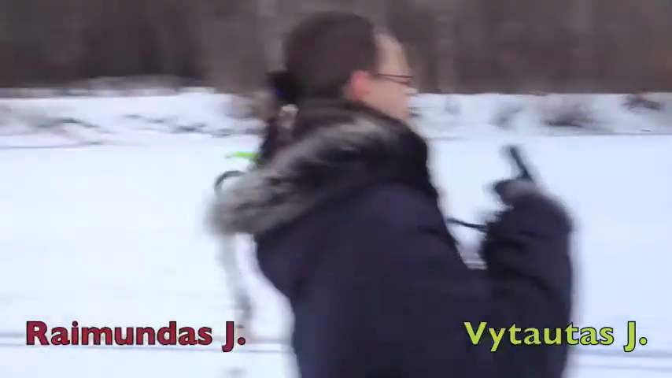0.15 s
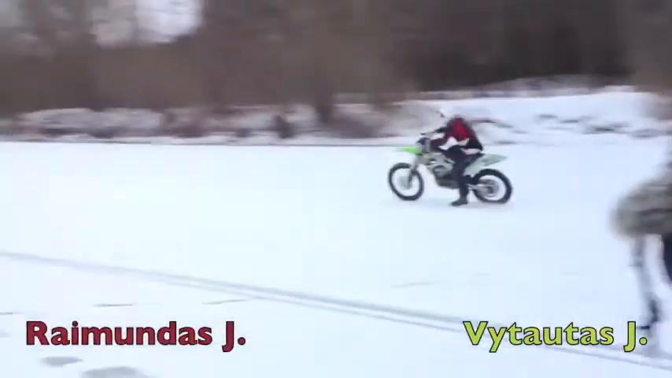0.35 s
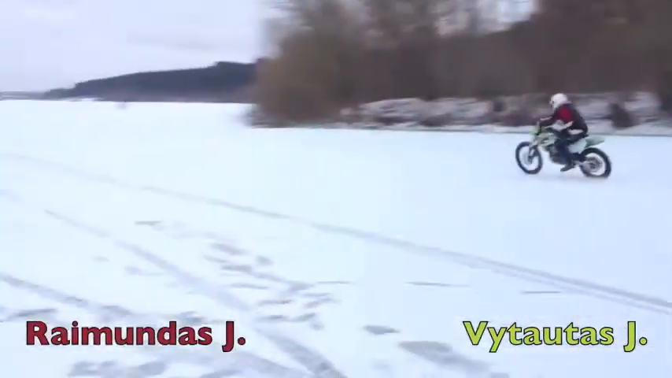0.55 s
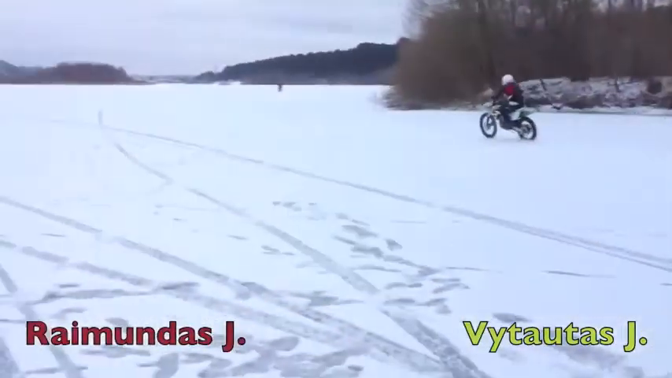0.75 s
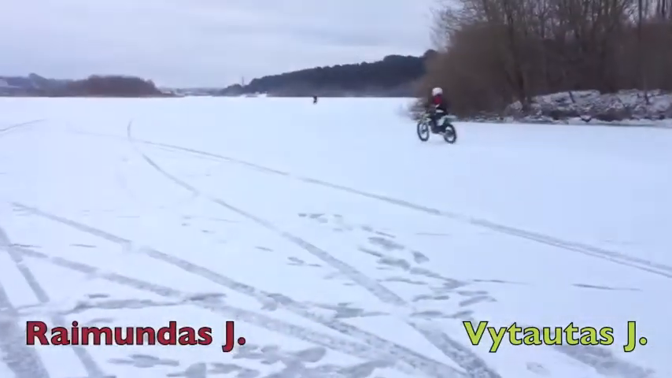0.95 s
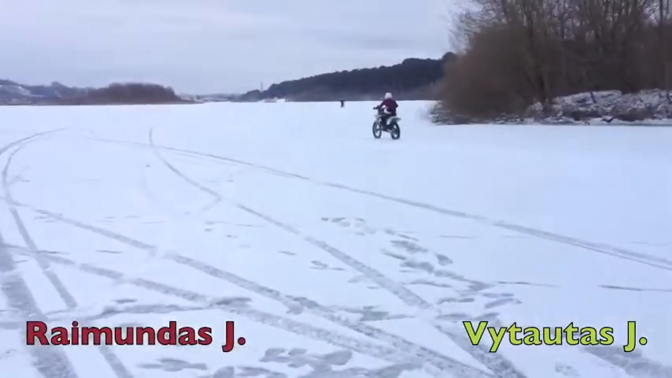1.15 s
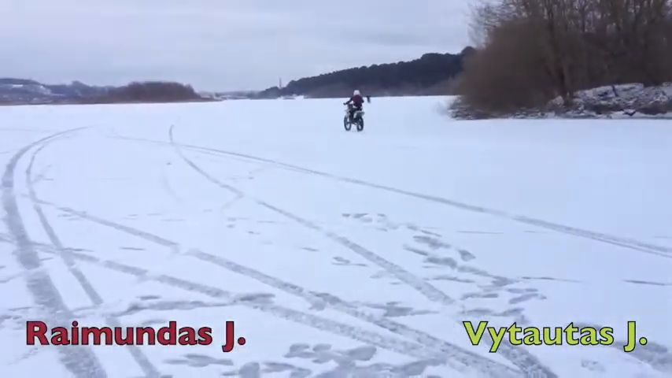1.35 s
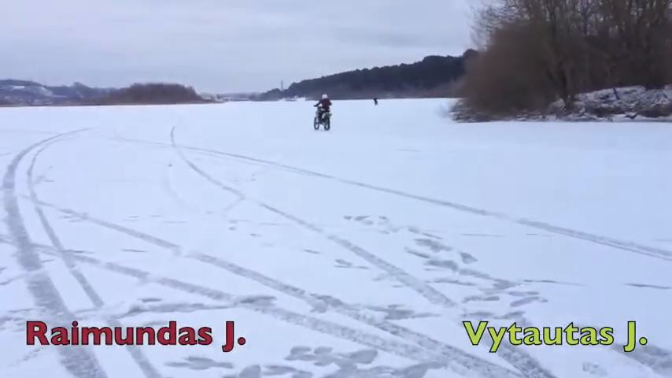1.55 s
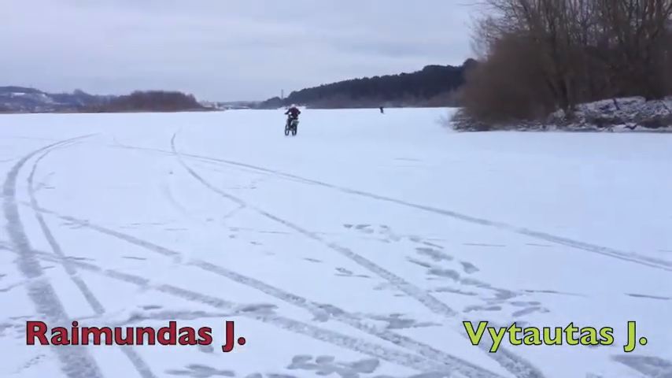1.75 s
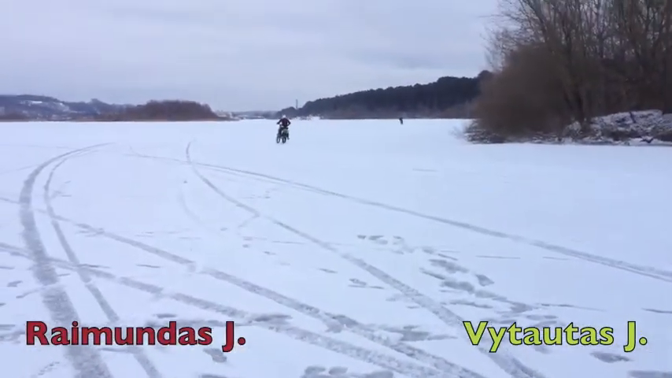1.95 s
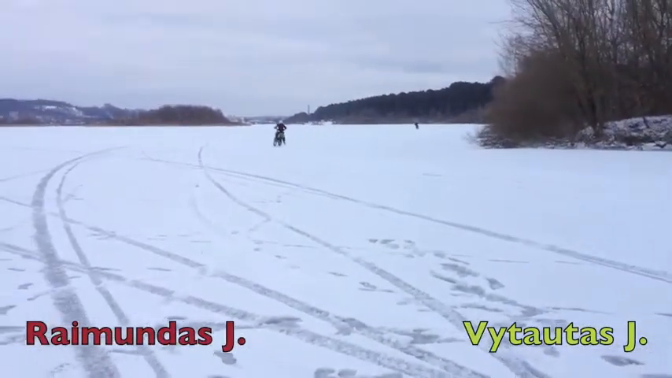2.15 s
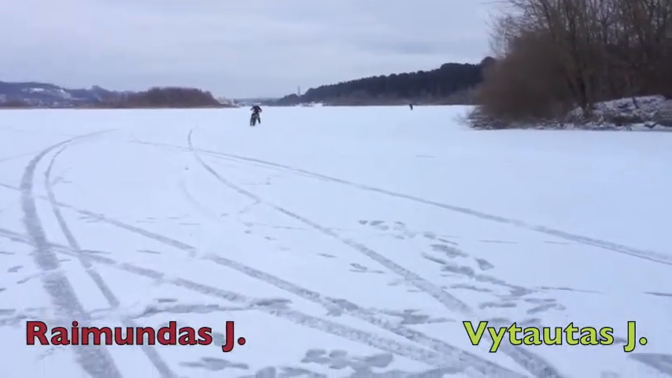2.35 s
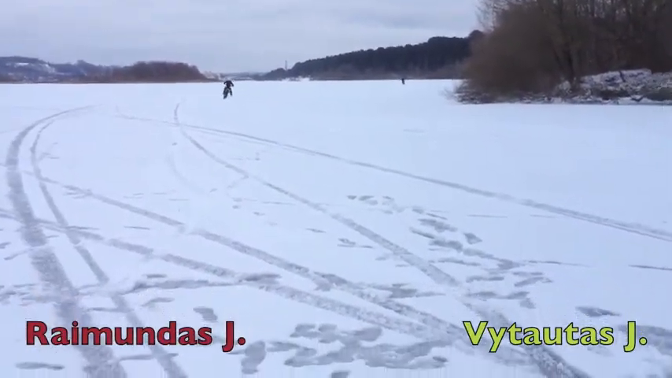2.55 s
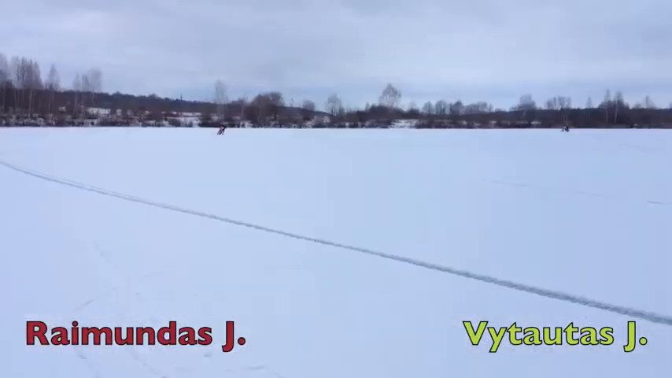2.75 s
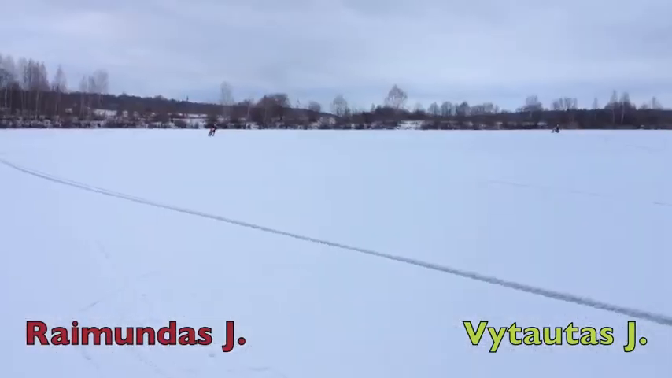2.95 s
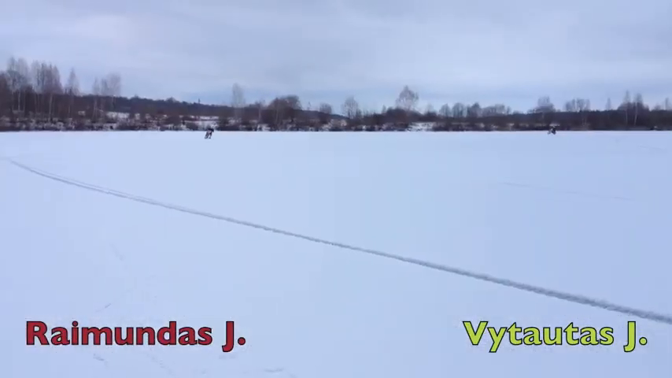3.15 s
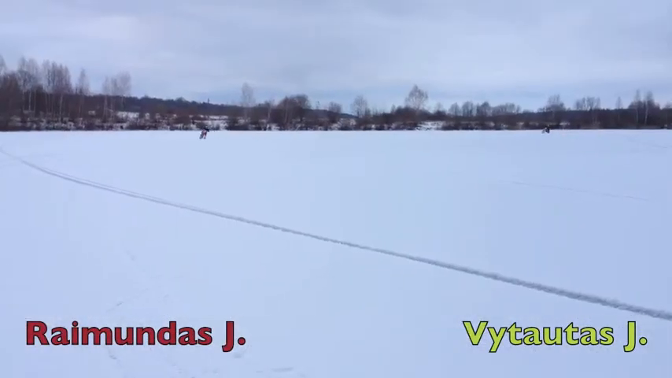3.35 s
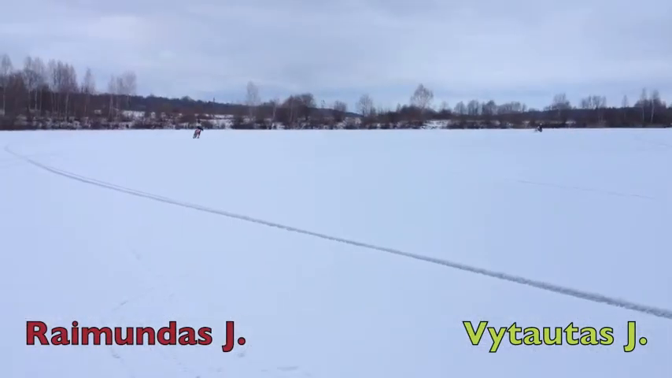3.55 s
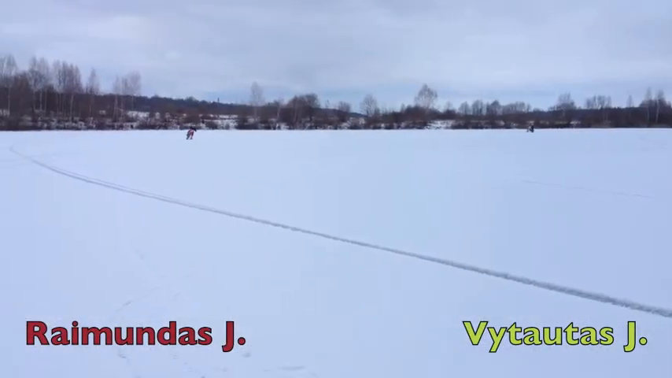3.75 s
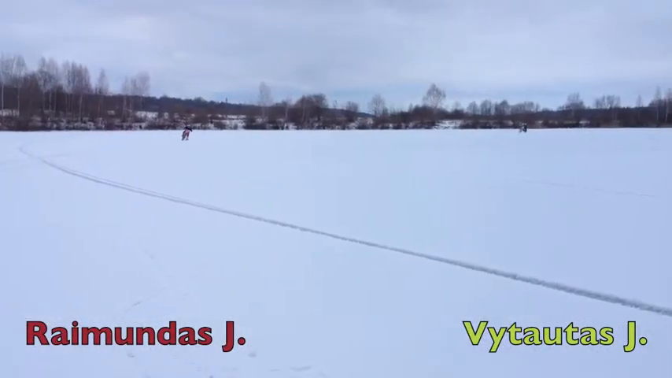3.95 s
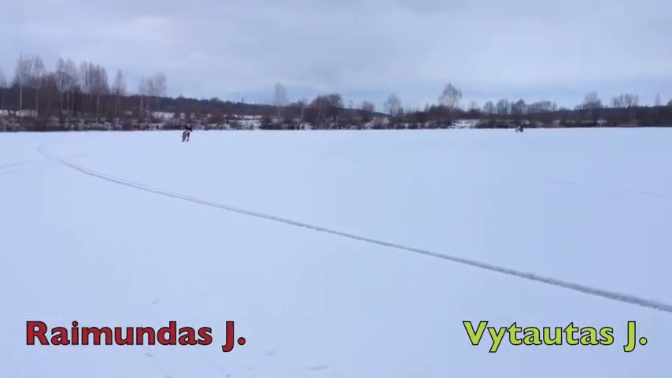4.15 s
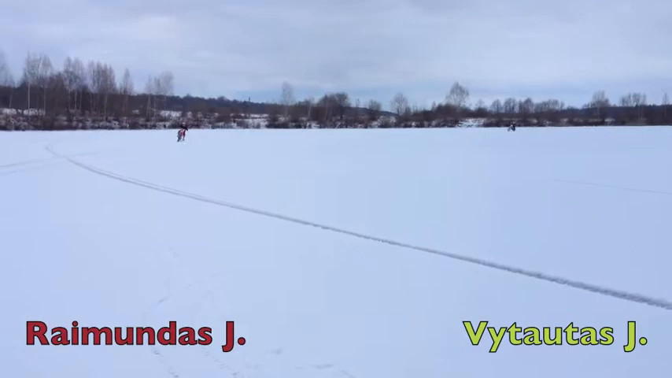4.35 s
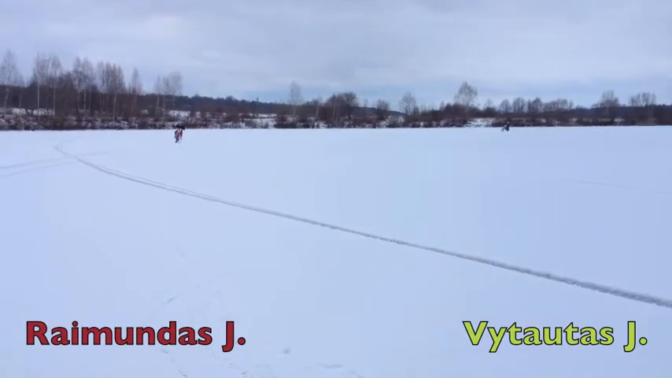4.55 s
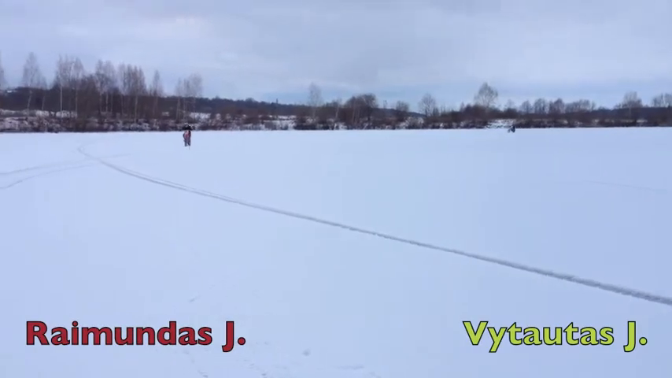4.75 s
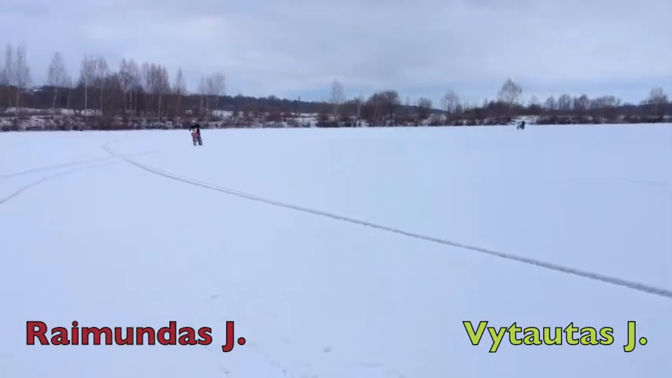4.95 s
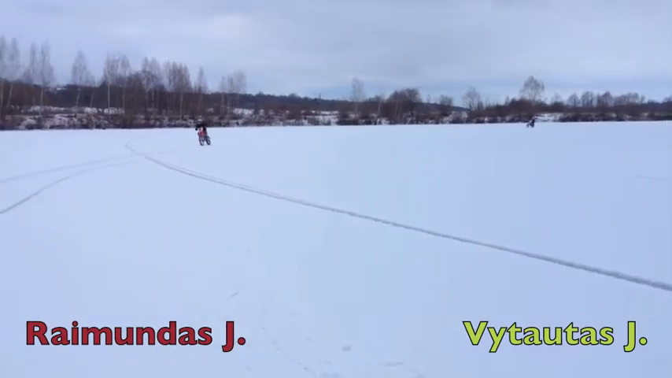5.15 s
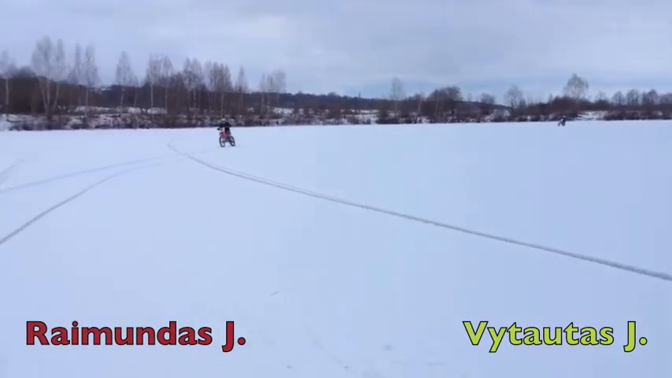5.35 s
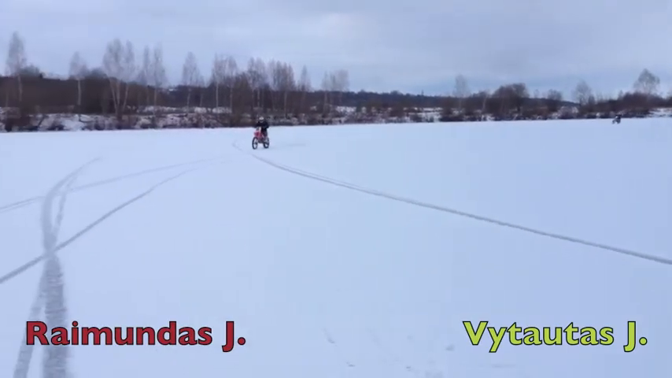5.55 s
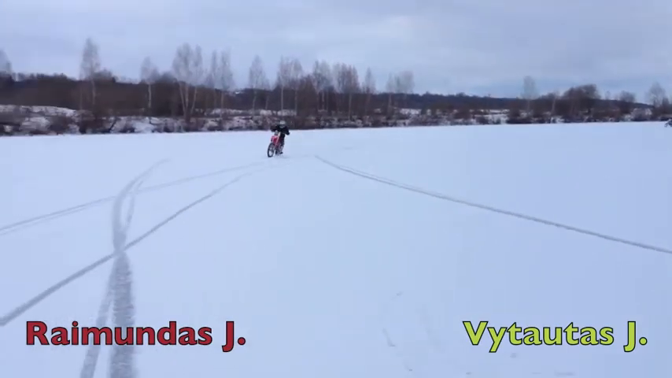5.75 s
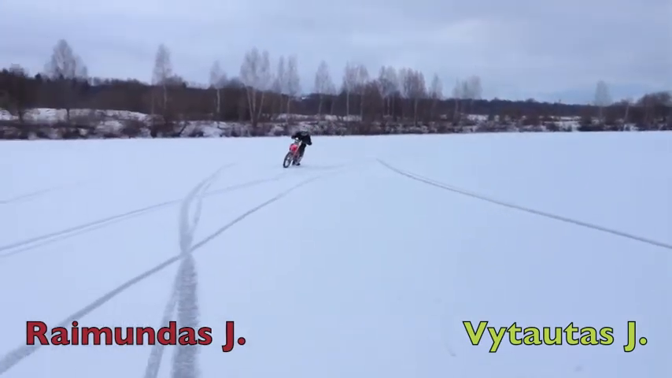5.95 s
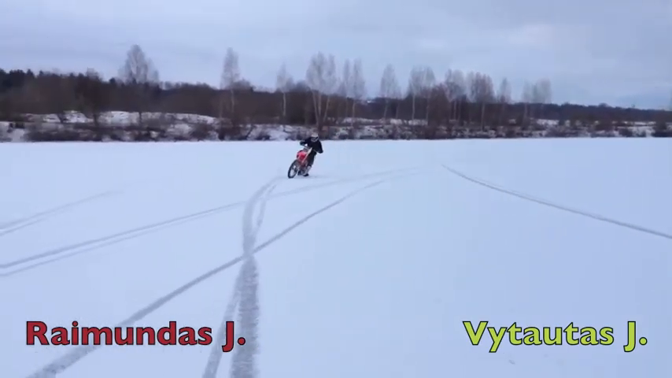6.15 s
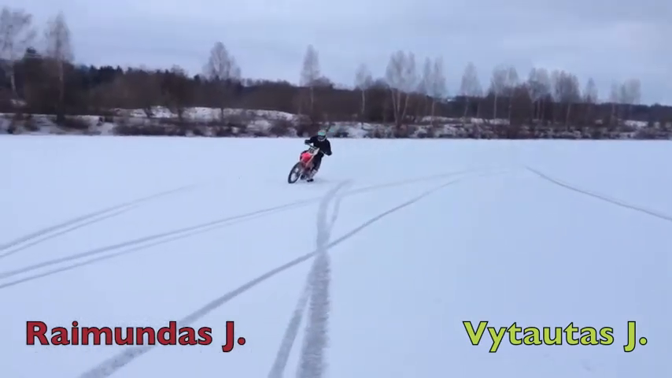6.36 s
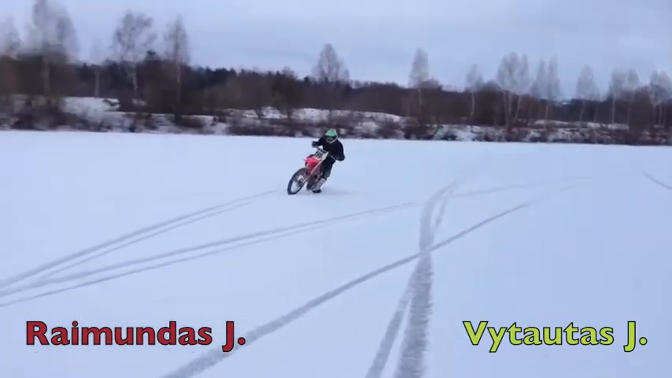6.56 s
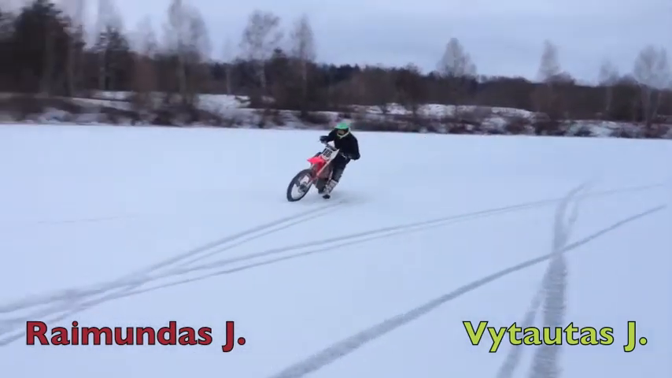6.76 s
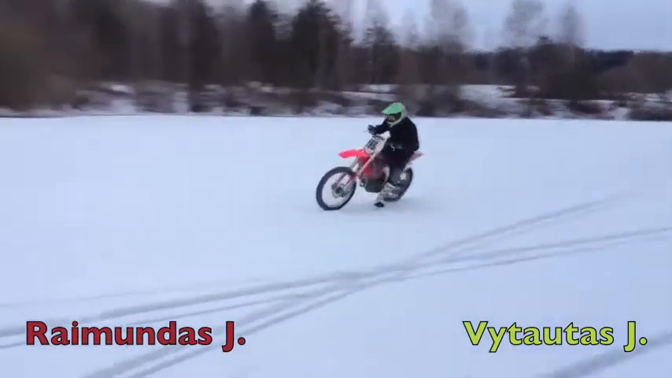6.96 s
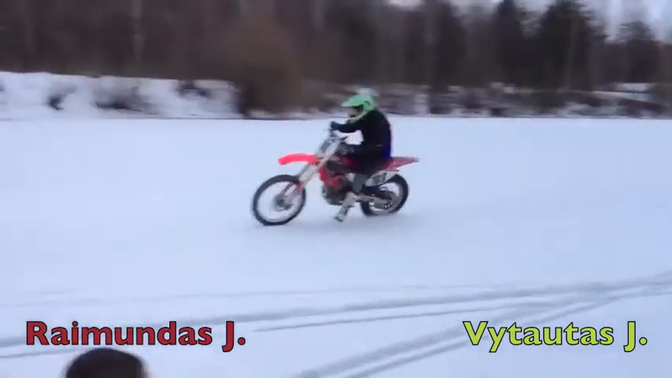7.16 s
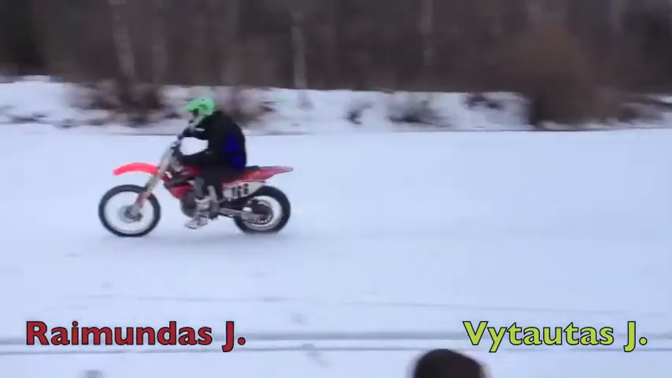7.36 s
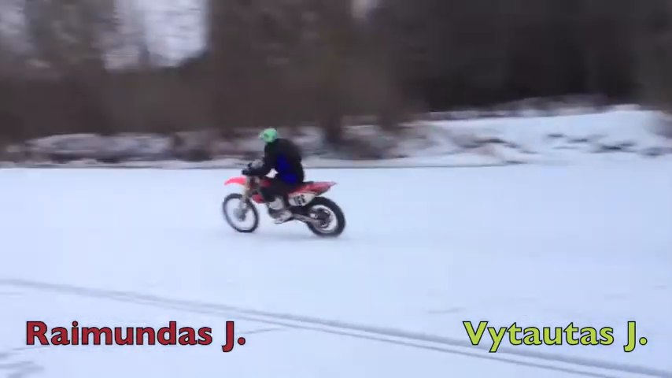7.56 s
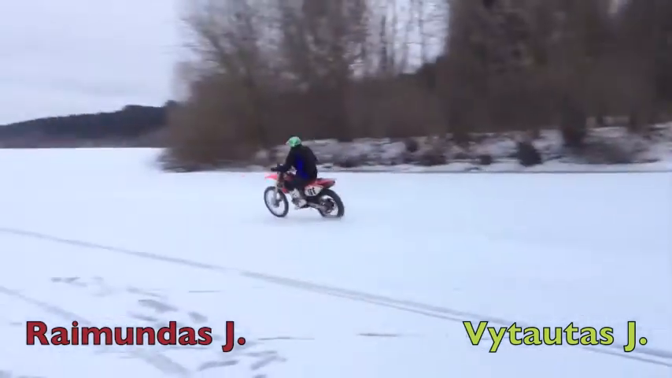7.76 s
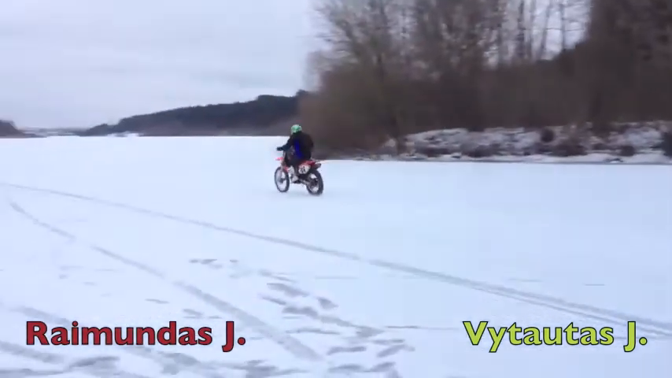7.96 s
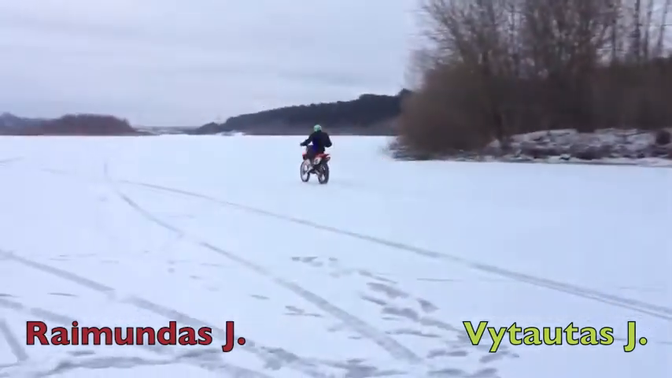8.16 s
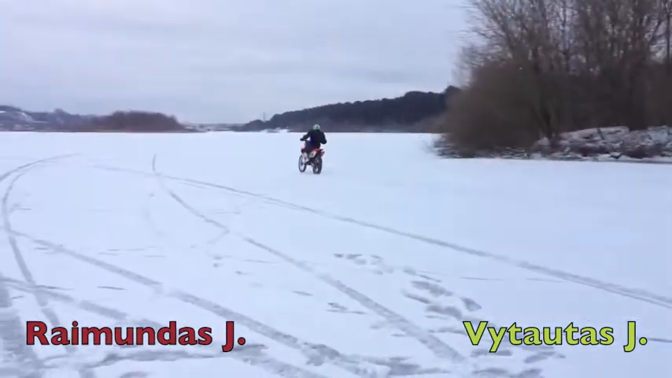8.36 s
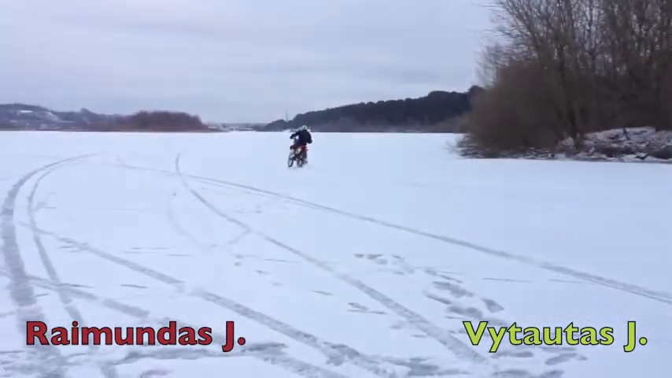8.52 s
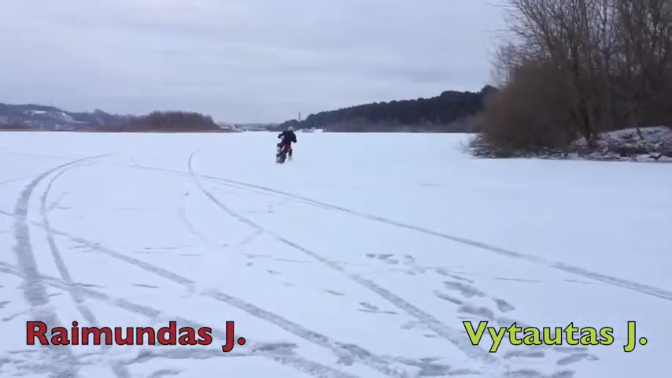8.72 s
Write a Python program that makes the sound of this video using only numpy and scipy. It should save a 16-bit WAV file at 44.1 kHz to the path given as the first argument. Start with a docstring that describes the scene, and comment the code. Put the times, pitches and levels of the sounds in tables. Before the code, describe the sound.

A dirt bike passes close right at the start, its rattling, droning engine turning into a sharp exhaust crackle by about 0.5 seconds, with a brief hiss of snow. Another engine hums faintly far off. At 1.4 seconds the throttle shuts and the pitch sinks to a ragged burble; from 2.2 seconds it picks up again with a couple of backfire pops. At 2.6 seconds the sound dips briefly and a second dirt bike takes over, distant, with a steady drone and slight whine. It grows louder, its pitch sagging near 5 seconds and rising again. It passes close and loud around 7.2 seconds, the rasp giving way to hard exhaust cracks as the pitch falls. Near 7.9 seconds it eases off with a few pops, then revs up and pulls away until the end, near 8.8 seconds. Light wind occasionally rumbles on the microphone.

```python
"""Two dirt bikes on snow

Two single-cylinder four-strokes are heard in turn, joined by a quick fade. The first passes, rides off,
coasts and picks up again, another droning far off; the second comes from afar, passes and pulls away.
Periodic firing gives a harmonic drone, and the mechanism a rattling rasp. The exhaust is directional:
from behind, each firing cracks out of the tailpipe. Stray backfires, hiss and light wind join in."""
import sys
import numpy as np
from scipy import signal
from scipy.fft import rfft, irfft, next_fast_len
from scipy.io import wavfile
from scipy.ndimage import uniform_filter1d, map_coordinates

SR = 44100
rng = np.random.default_rng(int(sys.argv[2]) if len(sys.argv) > 2 else 0)


def dump(signal):
    """Clip the signal to [-1, 1] and save it as 16-bit WAV at the path in sys.argv[1]."""
    limited = np.clip(np.atleast_2d(signal).T, -1, 1)
    pcm = np.round(limited * 32767).astype(np.int16)
    wavfile.write(sys.argv[1], SR, pcm)


N = 387638
T = np.arange(N) / SR

# exhaust spectrum of the second bike and of the backfires: f/Hz, relative level/dB
EXHAUST_SPECTRUM = [(250, -18), (450, -12.5), (700, -15.5), (1000, -10.5), (1350, 0), (1700, -2), (2250, 3),
                    (3000, -3.5), (3500, -7.5), (4050, -20.5), (4550, -15), (5400, -25.5), (7300, -10.5),
                    (8500, -20), (10500, -32.5), (13000, -62), (15500, -36)]


def first_bike():
    """Source directivity: an early, quick pass turns the sound from intake rasp to exhaust cracks."""
    speed = [(0, 69.08), (0.3, 69.0), (0.6, 68.54), (0.87, 68.58), (1, 71.64), (1.15, 69.33), (1.38, 66.86),
             (1.46, 56.97), (1.6, 52.62), (1.85, 48.82), (2.15, 49.41), (2.28, 55.47), (2.45, 58.83),
             (2.61, 62.91)]  # firing rate: t/s, f/Hz
    nearness = [(0.0, -4), (0.3, -3), (0.7, -2.5), (1.0, -4), (1.38, -4.5), (1.8, -6.5), (2.2, -5.5),
                (2.5, -3.5)]  # closeness to the listener: t/s, level/dB
    crack_spectrum = [(250, -7), (450, -17), (700, -23), (1000, -6.5), (1250, -2), (1600, -6), (2250, -6.5),
                      (2700, -12.5), (3150, -7.5), (3600, -15.5), (4500, -13), (6500, -9), (8000, -19),
                      (9600, -30.5), (13000, -21), (15500, -63)]  # exhaust pulses: f/Hz, relative level/dB
    rattle_spectrum = [(250, -33), (450, -15), (700, -19), (1050, -6), (1600, -12), (2150, 2.5), (2600, 3),
                       (3100, 4.5), (3700, -3.5), (5000, -5), (7000, -2), (8400, -9), (9600, -13.5),
                       (13000, 19.5), (15500, 24)]  # mechanical noise: f/Hz, relative level/dB
    pipe_ring = [(0, 1250), (.25, 1310), (.5, 1900), (.85, 2400), (1.1, 2080), (1.4, 2180), (2.3, 2210)]  # tailpipe resonance: t/s, f/Hz
    voicing = [(140, 3), (205, -3), (275, -0.5), (345, -2.5), (450, 3)]  # colouring of the drone: f/Hz, gain/dB
    # moving notch and peaks: t/s, f/Hz, gain/dB
    hollow = [(.05, 1980, -7), (.22, 1750, -8), (.33, 2600, 7), (.5, 3140, -10), (.66, 3220, -20),
              (.8, 3340, -29), (.95, 3120, -18), (1.05, 3900, -2), (1.3, 4750, 1), (1.6, 4500, -9),
              (2.4, 3900, -10)]  # the echo off the snow interferes with the direct sound
    bark = [(.1, 1110, 8.5), (.5, 1220, 11), (.7, 1320, 4.5), (.9, 2160, 5.5), (1.3, 2220, 12.5),
            (1.5, 1980, 9.5), (2.4, 2040, 8)]  # broad exhaust peak, climbing as the pipe turns toward the listener
    edge = [(.1, 3000, -13), (.33, 4640, 1), (.5, 3980, 3), (.68, 4300, 9), (.85, 4650, 4.5),
            (1.05, 6000, 6.5), (1.3, 7850, 5), (1.6, 7000, 1.5), (2.2, 3100, 0), (2.4, 3160, 4.5)]  # higher, rasping peak
    nasal = [(.15, 2190, 5), (.4, 1900, 4.5), (.7, 1300, 0.5), (1.0, 1270, 10.5), (1.4, 1250, 3),
             (2.0, 1400, -2.5), (2.4, 1480, 0)]  # nasal peak beside the bark
    return engine(
        speed, nearness, crack_spectrum, rattle_spectrum, pipe_ring, voicing, (hollow, bark, edge, nasal),
        start_cycle=.71, abeam_s=.44, swing_s=.18, bands_db=[-14.5, -13, -19, -27],
        idle_db=-6, pull_db=12, aim_db=6.5, repeat_db=-5.5, whine_db=-16, least_ragged=.36,
        ring_s=.0019, ring_db=0, ring_scatter=.057, jet_s=.0034, jet_db=7, can_db=-2.5,
        bounce_s=.000763, reflection=.75)


def second_bike():
    """Spreading loss and directivity: the engine swells from afar, then its exhaust swings into line."""
    speed = [(2.63, 67.17), (2.9, 69.12), (3.45, 68.6), (3.88, 74.8), (4.25, 75.45), (4.7, 74.34),
             (4.85, 66.2), (5, 61.59), (5.22, 74.0), (5.42, 79.45), (5.6, 73.85), (6.2, 75.6),
             (6.82, 75.05), (7.2, 71.17), (7.88, 65.05), (7.98, 53.23), (8.1, 55.67), (8.28, 55.61),
             (8.4, 57.69), (8.58, 59.05), (8.67, 64.26)]  # firing rate: t/s, f/Hz
    nearness = [(2.63, -12), (3.4, -9.5), (4.3, -8), (5.0, -6), (5.4, -3), (5.698, -2.5), (6.4, -0.5),
                (7.15, 1.5), (7.75, -0.97), (8.1, -1), (8.448, -1.5), (8.601, -4.5), (8.79, -4.5)]  # closeness to the listener: t/s, level/dB
    rattle_spectrum = [(250, -46), (450, -17), (600, -18.5), (800, -14), (1000, -4), (1200, 0.5),
                       (1550, -4), (1900, -2), (2170, -0.5), (2550, -4.5), (3200, -7), (3900, -15),
                       (5000, -17.5), (6400, -8), (7700, -14.5), (9700, -38), (13500, -37.5)]  # mechanical noise: f/Hz, relative level/dB
    pipe_ring = [(6.7, 2040), (7.3, 2210), (7.6, 2420), (7.8, 2940), (7.9, 2050), (8.51, 2220),
                 (8.58, 3000), (8.67, 2430)]  # tailpipe resonance: t/s, f/Hz
    voicing = [(140, -0.37), (205, -0.18), (275, -0.36), (345, 0.87), (450, -0.14)]  # colouring of the drone: f/Hz, gain/dB
    # ground-echo notch, exhaust bark, rasping peak and nasal peak: t/s, f/Hz, gain/dB
    hollow = [(2.8, 4960, 1), (4.3, 5200, -3), (5.6, 4500, -8), (6.7, 3240, 0), (7.0, 1890, -5.5),
              (7.3, 1650, -9), (7.55, 1830, -9), (7.7, 2120, -7), (7.8, 2440, -13), (7.95, 3900, 2),
              (8.4, 4050, -6), (8.55, 5500, -6)]
    bark = [(2.8, 1870, 6.5), (4.68, 1970, 5.5), (4.78, 2700, 4), (5.3, 2780, 3.5), (5.9, 2800, 4.5),
            (6.6, 2190, 2.5), (7.3, 2240, -0.5), (7.5, 2600, 3.5), (7.7, 3020, -0.5), (7.82, 3300, -2),
            (8.0, 2300, 0), (8.4, 2420, 5), (8.6, 2890, 0)]
    edge = [(3, 5770, 4), (4.25, 4020, 9.1), (5.4, 5500, 2.9), (7.1, 6750, 2), (7.75, 8300, 2.8),
            (8.451, 7450, 0.83), (8.58, 4400, 7.9), (8.79, 4200, 5.5)]
    nasal = [(3.1, 1310, 2.5), (4.7, 1150, -0.5), (4.92, 1200, 2.5), (5.08, 1250, 0), (5.2, 2030, 3),
             (5.55, 2050, 3), (6.6, 1700, -1), (6.92, 1500, 2.5), (7.15, 1280, 6.5), (7.45, 1330, 3.5),
             (7.72, 1290, 5.5), (7.82, 1880, -1), (8.3, 1500, 0.5), (8.6, 1410, 0)]
    return engine(
        speed, nearness, EXHAUST_SPECTRUM, rattle_spectrum, pipe_ring, voicing,
        (hollow, bark, edge, nasal),
        start_cycle=.0892, abeam_s=7.19, swing_s=.6, bands_db=[-18.5, -8.5, -20, -27.5],
        idle_db=-10, pull_db=-6, aim_db=34, repeat_db=-6, whine_db=-4.5, least_ragged=.27,
        ring_s=.0013, ring_db=2.5, ring_scatter=.084, jet_s=.0024, jet_db=6, can_db=-12.5,
        bounce_s=.001145, reflection=.54)


def engine(speed, nearness, crack_spectrum, rattle_spectrum, pipe_ring, voicing, formants, start_cycle,
           abeam_s, swing_s, bands_db, idle_db, pull_db, aim_db, repeat_db, whine_db, least_ragged,
           **crack_shape):
    """Superposition: drone, cracks and rattle add, weighted by throttle, nearness and direction."""
    # one value for each band: body, rasp, hiss, fizz
    shut_loss = [15.6, 29.43, 15.65, 21]  # with the throttle shut: loss/dB
    rear_loss = [5.6, 0.48, 5.6, 2]  # from behind: loss/dB
    falloff = [1.96, 1.464, 2.3, 3.66]  # absorption by snow and air: slope/(dB per dB of nearness)
    # runs of harder or softer firings: t/s, half length/s, body and rasp gain/dB, hiss and fizz gain/dB
    loads = [(0.133, 0.043, 1.5, -29.5), (0.433, 0.12, 0.5, 6), (0.695, 0.13, 5.5, 6.5),
             (0.746, 0.0086, -2.5, -1), (0.863, 0.037, 4.5, 8), (0.95, 0.025, -2, 4.5),
             (1.29, 0.024, -5, -7), (1.348, 0.04, 3, 6), (2.45, 0.17, -3, -5), (2.95, 0.13, 5, 0),
             (3.74, 0.59, 4, -11), (4.223, 0.15, 6, 22.5), (4.624, 0.21, 8, 9), (5.357, 0.26, -4.5, 14),
             (7.355, 0.25, 2, 2.5), (7.732, 0.15, 3, 8.5), (8.517, 0.073, 4.5, 5), (8.748, 0.042, 3, 6)]
    rate, = curve(speed)
    near, = curve(nearness)
    ring_hz, = curve(pipe_ring)
    opening = throttle()
    pulling = np.minimum(opening / .55, 1)  # below 1 the engine begins to coast
    rear = .5 + .5 * np.tanh((T - abeam_s) / swing_s)  # 0 from the front, 1 from behind
    turns, age, strength, chance = crank(rate, start_cycle)
    damping = np.exp(2.2 * (opening - .5))  # the wider the throttle, the shorter each crack
    crack = exhaust_cracks(age, strength, chance, ring_hz, crack_spectrum, damping, **crack_shape)
    crack = steady(bands(crack))
    rasp = steady(bands(rattle(turns, rattle_spectrum, repeat_db)))
    masking_db = .84 * np.maximum(near + 4.5, 0)  # close by, the rattle outgrows the whine
    rasp[0] += amp(whine_db - masking_db) * gear_whine(turns)
    load = amp(sum(np.outer([low, low, high, high], swell(s, half)) for s, half, low, high in loads))
    tilt_db = np.array([1.5, 4, -3, -11.5])[:, None]  # the cracks stand out less in the hiss
    crack_ratio = amp(idle_db + opening * (pull_db + aim_db * rear)) * amp(tilt_db)
    rattle_share = 1 / (1 + crack_ratio ** 2)  # of the power
    gains = amp([db + slope * near - shut * (1 - opening) - behind * rear
                 for db, slope, shut, behind in zip(bands_db, falloff, shut_loss, rear_loss)])
    voice = gains * (load * crack_ratio * crack + rasp) * np.sqrt(rattle_share)
    orders_db = [order_db(hz, near, rear, opening, pulling) + read(voicing, hz) + drone_swells_db(hz)
                 for hz in (k * rate for k in range(2, 8))]
    boom = drone(turns, rattle_share[0], orders_db, raggedness(opening, pulling, least_ragged))
    return moving_formants(voice.sum(0), formants) + boom + frame_buzz(turns, near, rear, pulling)


def throttle(open_s=.11, shut_s=.064):
    """Ramp response: the grip opens quickly and snaps shut more quickly."""
    twists = [(-.2, 0.63), (.75, 0.68), (1.387, 0), (2.22, 0.36), (2.6, 0.49), (3.47, 0.51), (4.05, 0.56),
              (4.682, 0.46), (5.001, 0.6), (5.47, 0.47), (5.9, 0.52), (7.859, 0.08), (8.02, 0.19),
              (8.242, 0.5), (8.49, 0.71)]  # grip positions, each held until the next: t/s, opening/(0 to 1)
    opening, before = np.zeros(N), 0
    for s, target in twists:
        ramp_s = open_s if target > before else shut_s
        opening += (target - before) * np.clip((T - s) / ramp_s, 0, 1)
        before = target
    return np.clip(opening, 0, 1)


def crank(rate, start_cycle, jitter_s=.00003):
    """Phase integrates rate: gives cycle count and each firing's age/s, strength and two random draws."""
    unevenness = [(.9, .9), (1.2, 2.2), (4.3, 2.4), (7.4, 1.3), (8.6, 1.3)]  # variation from firing to firing: t/s, spread/dB
    turns = start_cycle + np.cumsum(rate) / SR + jitter_s * rate * wander(70)
    deviation, *chance = rng.standard_normal((1024, 3))[turns.astype(int) + 1].T
    spread_db, = curve(unevenness)
    return turns, turns % 1 / rate, amp(spread_db * deviation), chance


def exhaust_cracks(age, strength, chance, ring_hz, spectrum, damping, ring_s, ring_db, ring_scatter,
                   jet_s, jet_db, can_db, bounce_s, reflection, can_hz=1210, can_s=.0009):
    """Impulse excitation: a shock echoes in the pipe, can and tailpipe ring, turbulent gas follows."""
    arrival_s, front_s = .000416, .00003
    since = np.maximum(age - arrival_s, 0)
    can = np.sin(2 * np.pi * can_hz * since) * since / can_s * np.exp(-since / can_s)
    fading = since * damping / ring_s
    pitch_hz = ring_hz * np.exp(ring_scatter * np.tanh(chance[0]))
    ring_envelope = np.sqrt(fading) * np.exp(-fading ** 2) * amp(1.2 * chance[1])
    ring = np.sin(2 * np.pi * pitch_hz * since) * ring_envelope
    trip_s = bounce_s * np.exp(.1 * chance[1])
    fronts = sum(reflection ** k * swell(arrival_s + k * trip_s, front_s, age) for k in range(3))
    shock = colour(fronts * strength, spectrum)
    jet_envelope = strength * (age > arrival_s) * np.exp(-since * damping / jet_s)
    jet = colour(rng.standard_normal(N) * jet_envelope, spectrum)
    ringing = amp(ring_db) * unit(ring * strength) + amp(can_db) * unit(can * strength)
    return shock + ringing + amp(jet_db) * jet


def drone(turns, rattle_share, orders_db, ragged, waver=.51, burble_db=-8):
    """Harmonic series: low orders boom from pipe and airbox; ragged burning shakes them and burbles."""
    burble_spectrum = [(40, -30), (85, -13), (120, -6), (160, 7), (300, -1.5), (380, -4), (480, -61),
                       (800, -14), (2000, -73)]  # combustion noise: f/Hz, relative level/dB
    total_rms = np.sqrt(sum(amp(db) ** 2 for db in orders_db))
    all_orders_db = [orders_db[0] - 29] + orders_db + [orders_db[-1] - 9]  # adds orders 1 and 8
    tone = np.zeros(N)
    for k, db in enumerate(all_orders_db, 1):
        flutter = 1 + waver * ragged * wander(45)
        slip = waver * ragged * wander(40)
        # from the front, where rattle leads, the orders arrive out of step and the beat is rounder
        phase = k * (turns - .16) + .33 * rattle_share * (k - 4) ** 2 / 2
        tone += np.sqrt(2) * amp(db) * flutter * np.cos(2 * np.pi * phase + slip)
    burble = total_rms * ragged * amp(burble_db) * colour(rng.standard_normal(N), burble_spectrum)
    return (tone + burble) / np.sqrt(1 + ragged ** 2)


def order_db(hz, near, rear, opening, pulling, airbox_hz=226.4, airbox_half_width_hz=46, lag_s=.0025):
    """Forced resonance: an order's level changes as it slides through the modes of pipe and airbox."""
    # response of pipe and airbox: f/Hz, level/dB
    pulling_front = [(100.0, -46), (140.0, -22.5), (190.0, -27), (230.0, -18.5), (285.0, -15),
                     (340.0, -26.5), (400.0, -26), (480.0, -46.5)]
    pulling_rear = [(100.0, -32), (140.0, -24.5), (190.0, -20), (230.0, -29), (285.0, -19), (340.0, -17),
                    (400.0, -31.5), (480.0, -33)]
    coasting = [(100.0, -45), (145.0, -22), (195.0, -26), (250.0, -29.5), (300.0, -25), (345.0, -27),
                (400.0, -28.5), (480.0, -49)]
    falloff = [(299, 1), (402, 2.5)]  # upper orders carry less far: f/Hz, slope/(dB per dB of nearness)
    loaded_db = (1 - rear) * read(pulling_front, hz) + rear * read(pulling_rear, hz)
    pipe_db = pulling * loaded_db + (1 - pulling) * read(coasting, hz) + 11 * (opening - 1)
    # the airbox honks forward once the throttle is wide open
    detuning = (hz - airbox_hz) / airbox_half_width_hz
    honk_db = 22.5 * (1 - rear) * np.tanh(4 * (opening - .49)) / (1 + detuning ** 2)
    # side on, intake and tailpipe arrive apart and partly cancel
    side_on = (4 * rear * (1 - rear)) ** (1 / 3)
    two_paths = 1 + .41 * side_on * np.exp(-2j * np.pi * hz * lag_s * rear)
    return near * read(falloff, hz) + pipe_db + honk_db + 20 * np.log10(abs(two_paths) + 1e-6)


def drone_swells_db(hz, half_octaves=.16, hop=64):
    """Amplitude modulation: at set moments single low harmonics of the drone dip or swell."""
    swells = [(0.323, 0.25, 340, 4), (.55, 0.28, 206, -9), (0.733, 0.44, 291, -11), (0.855, 0.23, 420, 6),
              (1.038, 0.14, 495, -14), (3.81, 0.32, 225, 6), (4.813, 0.085, 265, -14),
              (4.93, 0.13, 341, -16), (5.17, 0.44, 288, -6), (6.602, .35, 450, -5), (7.088, .08, 428, 7),
              (7.197, 0.25, 357, -6), (7.27, 0.12, 490, -19), (7.403, 0.13, 280, 3.5),
              (7.457, 0.13, 337, 4), (7.6, 0.2, 205, -14), (7.66, 0.2, 262, -7.5), (7.926, 0.046, 246, 11),
              (8.35, 0.45, 350, -8.5), (8.55, 0.96, 245, 6.5), (8.753, 0.12, 330, 2), (8.55, .3, 480, 8),
              (2.418, 0.12, 300, 1.5), (1.897, .3, 342, 3)]  # dips and swells in the drone: t/s, half length/s, f/Hz, gain/dB
    t, octave = T[::hop], np.log2(hz[::hop])
    gain_db = sum(db * swell(s, half, t) * swell(np.log2(centre), half_octaves, octave)
                  for s, half, centre, db in swells)
    return np.interp(T, t, gain_db)


def raggedness(opening, pulling, least, settle_s=.09):
    """Cyclic variation: burning is ragged when coasting and stumbles just after the throttle drops."""
    pole = np.exp(-1 / (settle_s * SR))
    recent = signal.lfilter([1 - pole], [1, -pole], opening)
    stumble = np.maximum(recent - opening, 0)
    return np.clip(least + .2 * (1 - pulling) + .9 * stumble, 0, 1)


def rattle(turns, spectrum, repeat_db, size=512):
    """Cyclostationary noise: intake, valve gear and chain clatter partly alike each cycle; metal rings."""
    blend = .96 * wander(4)
    one, other = (map_coordinates(pattern, [turns % 1 * size], order=1, mode="grid-wrap")
                  for pattern in rng.standard_normal((2, size)))
    repeating = unit(one * np.cos(blend) + other * np.sin(blend))
    noise = colour((rng.standard_normal(N) + amp(repeat_db) * repeating) * clatter(), spectrum)
    return noise + amp(-3) * resonate(noise, hz=2160, width_hz=130)


def clatter(per_s=330, decay_s=.0021, spread_db=3, share=.32):
    """Shot noise: the envelope of many small random knocks, each starting at once and dying quickly."""
    knocks = amp(spread_db * rng.standard_normal(N)) ** 2 * (rng.random(N) < per_s / SR)
    power = signal.lfilter([1], [1, -np.exp(-2 / (decay_s * SR))], knocks + 1e-12)
    return np.sqrt(1 - share + share * power / power.mean())


def moving_formants(x, formants, half_octaves=(.16, .34, .22, .33)):
    """Minimum-phase filtering: notch and peaks slide as the bike turns, ringing only after each crack."""
    frames = dict(nperseg=256, noverlap=192)
    hz, s, spectra = signal.stft(x, SR, return_onesided=False, **frames)
    octave = np.log2(abs(hz[:, None]) + 1)
    gain_db = 0
    for rows, width in zip(formants, half_octaves):
        times, centre_hz, db = np.transpose(rows)
        shape = swell(np.log2(np.interp(s, times, centre_hz)), width, octave)
        gain_db = gain_db + np.interp(s, times, db) * shape
    return signal.istft(spectra * minimum_phase(gain_db), SR, input_onesided=False, **frames)[1][:N].real


def backfires(snap_s=.0039, thud_s=.038, size=8192):
    """Free decay: stray hard firings snap out of the pipe and leave it booming for a moment."""
    firings = [(1.479, -22, 172, -25.5), (2.1722, -23, 212, -31), (2.339, -12, 298, -25),
               (2.4586, -6, 286, -25), (4.166, -22, 225, -42), (4.588, -24, 225, -42),
               (7.879, -8, 258, -27), (7.9425, -14, 159.4, -22), (7.9975, -19, 156, -27),
               (8.0196, -17, 155, -29)]  # t/s, relative snap level/dB, thud f/Hz, thud level/dB
    t = np.arange(size) / SR
    snap, thud = np.zeros((2, N))
    for s, snap_db, hz, thud_db in firings:
        at = round(s * SR)
        snap[at:at + size] += amp(snap_db) * np.exp(-t / snap_s)
        thud[at:at + size] += amp(thud_db) * np.sin(2 * np.pi * hz * t) * np.exp(-t / thud_s)
    snap *= colour(rng.standard_normal(N), EXHAUST_SPECTRUM)
    return amp(-8) * highpass(snap, hz=1800) + highpass(thud, hz=130, order=4)


def gear_whine(turns, waver_db=3, case_hz=1010, case_width_hz=170):
    """Forced vibration: gear and valve-train tones follow the crank and swell at a casing resonance."""
    partials = [(12, -18), (14, -10), (20, -6), (24, -25), (27, -7)]  # order of the firing rate, relative level/dB
    lines = sum(amp(db + waver_db * wander(23)) * np.sin(2 * np.pi * k * turns) for k, db in partials)
    casing = resonate(resonate(lines, case_hz, case_width_hz), case_hz, case_width_hz)
    return amp(-11) * lines + amp(8) * casing


def frame_buzz(turns, near, rear, pulling, waver_db=3):
    """Structure-borne sound: close by, frame and airbox buzz on the orders between drone and rasp."""
    lines = sum(amp(waver_db * wander(8)) * np.sin(2 * np.pi * (k * turns + rng.random()))
                for k in range(7, 14))
    return lines * pulling * amp(-44 + 5.3 * near - 6 * rear)


def snow_spray():
    """Amplitude-modulated noise: short surges of hiss, as of the rear tyre spinning in snow."""
    spectrum = [(1500, -25), (3000, 2), (4200, 8), (5100, 7), (6600, 2), (8400, -2.5), (9600, -16),
                (13000, -3), (15500, -21)]  # spray noise: f/Hz, relative level/dB
    surges = [(0.306, 0.1, -30.5, -39), (.6, 0.2, -44, -51), (2.39, 0.14, -36.5, -43.5)]  # t/s, half length/s, hiss level/dB, fizz level/dB
    hiss, fizz = bands(colour(rng.standard_normal(N), spectrum))[2:]
    return sum(swell(s, half) * (amp(hiss_db) * hiss + amp(fizz_db) * fizz)
               for s, half, hiss_db, fizz_db in surges)


def far_bike():
    """Beating: the low harmonics of a distant engine at nearly steady speed meet those of the near one."""
    course = [(0, 76, -27.5), (1, 73, -28.5), (1.7, 76.6, -55), (2.6, 80, -32)]  # firing rate and loudness: t/s, f/Hz, level/dB
    partials = [(2, -14), (3, -1.5), (4, -13)]  # order of the firing rate, relative level/dB
    rate, level_db = curve(course)
    turns = np.cumsum(rate) / SR
    return sum(np.sqrt(2) * amp(level_db + db) * np.sin(2 * np.pi * k * turns) for k, db in partials)


def wind(calm_db=-83):
    """Turbulent pressure fluctuation: light gusts rumble on the microphone."""
    spectrum = [(10, 16), (35, -20), (70, -35), (150, 5), (500, -38), (2000, -63)]  # rumble: f/Hz, relative level/dB
    gusts = [(.3, .12, -57), (.85, .45, -56), (1.37, .08, -60.5), (2.38, 0.13, -73), (6.7, 0.76, -65),
             (7.7, .12, -54), (8.55, .08, -55), (8.79, .08, -56)]  # t/s, half length/s, level/dB
    envelope = amp(calm_db) + sum(amp(db) * swell(s, half) for s, half, db in gusts)
    return envelope * colour(rng.standard_normal(N), spectrum)


def amp(db):
    """Level in decibels to amplitude ratio."""
    return np.exp(np.asarray(db) * (np.log(10) / 20))


def unit(x):
    """Normalisation to rms 1."""
    return x / np.sqrt(np.mean(x ** 2) + 1e-20)


def steady(x, size=6615):
    """Running normalisation: holds each band at rms 1 over several firings."""
    power = uniform_filter1d(uniform_filter1d(x ** 2, size), size // 2)
    return x / np.sqrt(abs(power) + 1e-9)


def swell(middle, half_width, axis=T):
    """Gaussian rise and fall of height 1."""
    return np.exp(-np.minimum(((axis - middle) / half_width) ** 2, 20))


def wander(per_s):
    """Slow random modulation of rms 1."""
    knots = rng.standard_normal(4096)
    return unit(np.interp(T * per_s, np.arange(len(knots)), knots))


def curve(rows):
    """Linear interpolation of each column of a time table, at every sample."""
    s, *columns = np.transpose(rows)
    return [np.interp(T, s, column) for column in columns]


def read(spectrum, hz):
    """Interpolation of a spectrum's level/dB over log frequency."""
    f, db = np.transpose(spectrum)
    return np.interp(np.log(hz + 1), np.log(f + 1), db)


def minimum_phase(gain_db):
    """Hilbert relation: the causal frequency response with the given magnitude."""
    return np.exp(np.conj(signal.hilbert(np.log(amp(gain_db)), axis=0)))


def colour(x, spectrum, size=4096):
    """Convolution with a causal filter of the given spectrum; the result has rms 1."""
    gain_db = np.maximum(read(spectrum, abs(np.fft.fftfreq(size, 1 / SR))), -100)
    taps = np.fft.ifft(minimum_phase(gain_db)).real
    return unit(signal.oaconvolve(x, taps[:size // 2])[:N])


def bands(x):
    """Filter bank: body, rasp, hiss and fizz, each of rms 1."""
    crossovers = [330, 1600, 3800, 9500]  # lower edge of each band: f/Hz
    size = next_fast_len(N)
    hz, spectrum = np.fft.rfftfreq(size, 1 / SR), rfft(x, size)
    below = [1 / (1 + (hz / edge) ** 12) for edge in crossovers] + [1]
    return np.array([unit(irfft(spectrum * (upper - lower), size)[:N])
                     for lower, upper in zip(below, below[1:])])


def resonate(x, hz, width_hz):
    """Second-order resonance of peak gain 1."""
    return signal.lfilter(*signal.iirpeak(hz, hz / width_hz, fs=SR), x)


def highpass(x, hz, order=2):
    """Maximally flat high-pass filter."""
    return signal.lfilter(*signal.butter(order, hz, "highpass", fs=SR), x)


def scene(change_s=2.617, out_s=.062, in_s=.06, gap_db=-28):
    """Superposition of all sources; the level dips briefly as the first bike gives way to the second."""
    bikes = np.where(T < change_s, first_bike() + far_bike(), second_bike())
    ramp = np.maximum((change_s - T) / out_s, (T - change_s) / in_s)
    fade = np.minimum(ramp ** 1.6 + amp(gap_db), 1)
    return ((bikes + backfires() + snow_spray() + wind()) * fade)[None]


def record(dry, ceiling=.76, band_limit_hz=15600):
    """Soft saturation rounds off the loudest cracks; a low-pass filter then limits the band."""
    rounded = dry / (1 + (dry / ceiling) ** 4) ** (1 / 4)
    distortion = highpass(rounded - dry, hz=250)  # the overload adds no bass
    taps = signal.firwin(511, band_limit_hz, window=("kaiser", 9), fs=SR)
    return signal.oaconvolve(dry + distortion, taps[None], "same")


dry = scene()
out = record(dry)
dump(out)
```